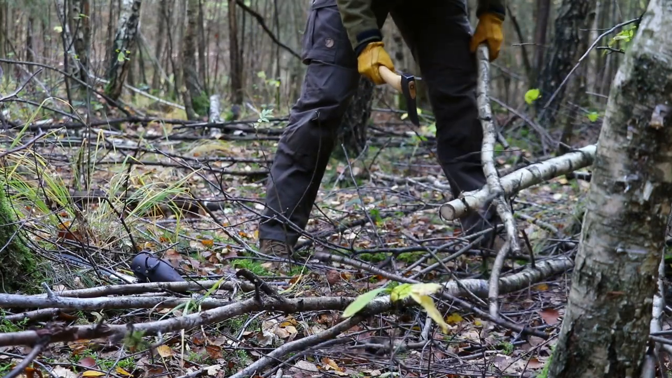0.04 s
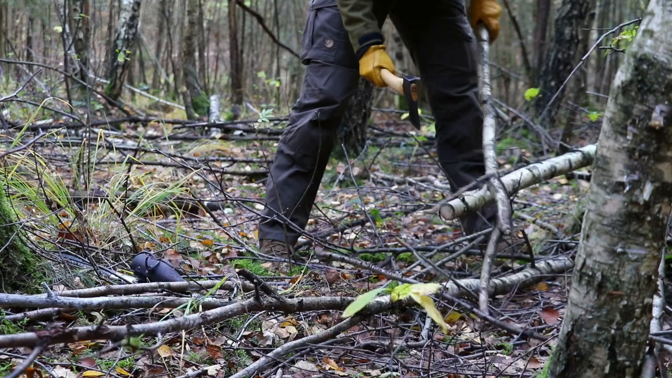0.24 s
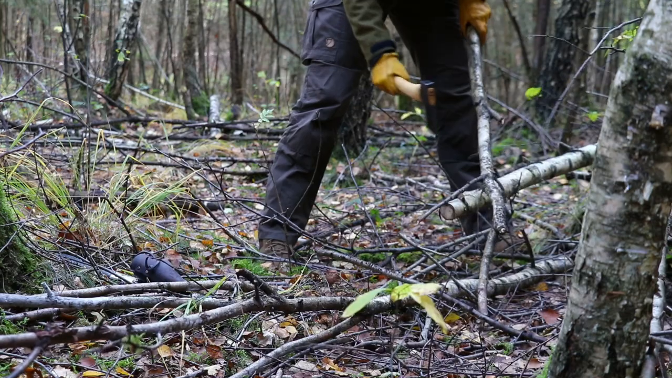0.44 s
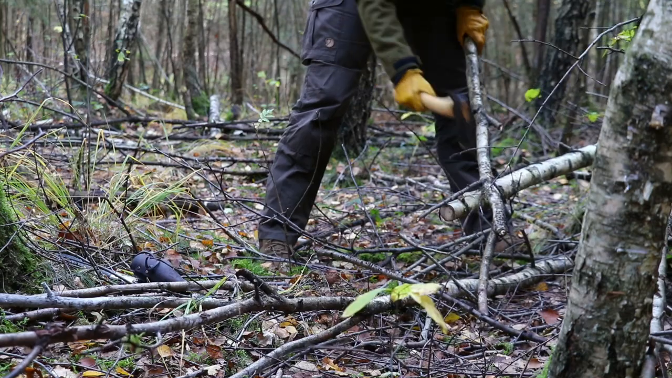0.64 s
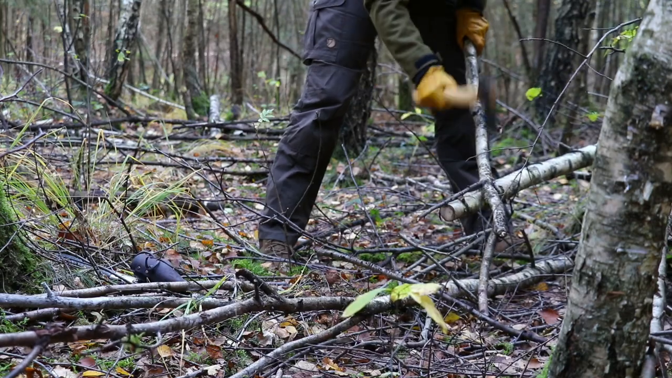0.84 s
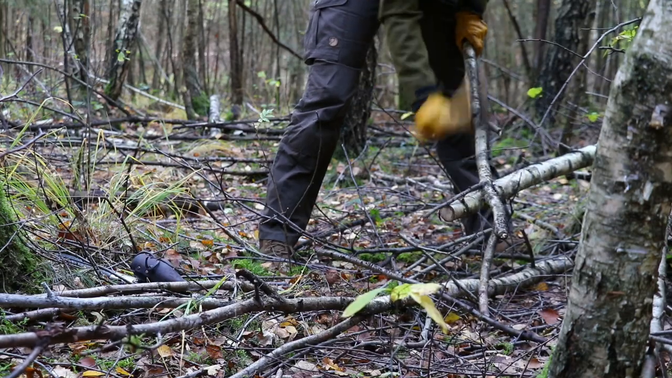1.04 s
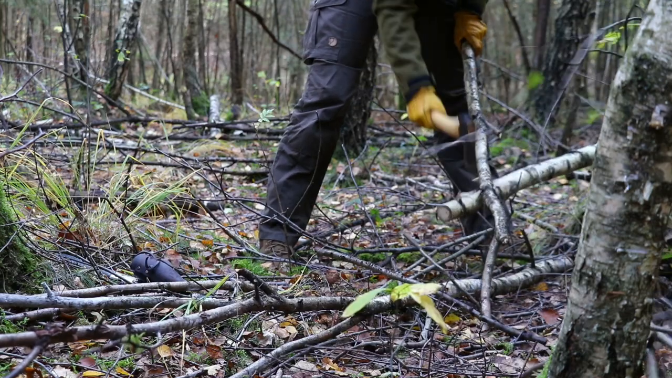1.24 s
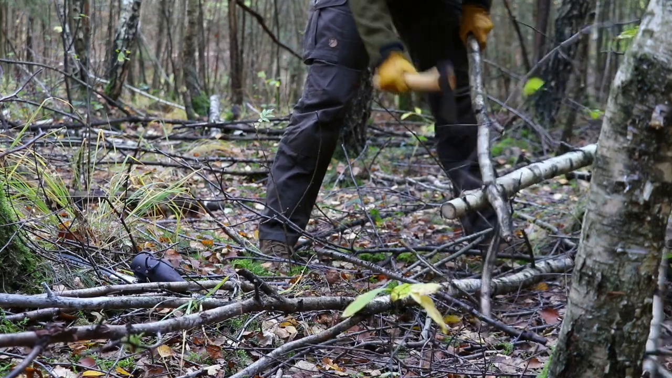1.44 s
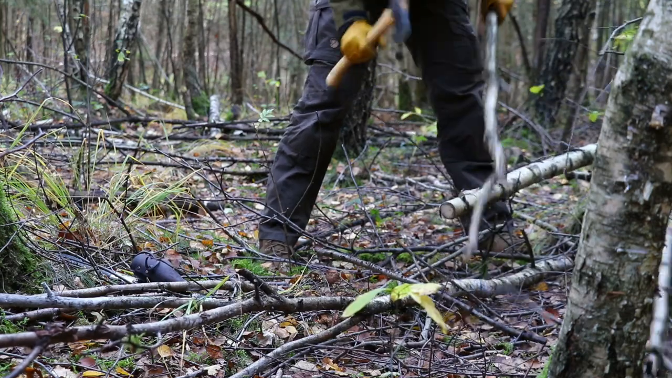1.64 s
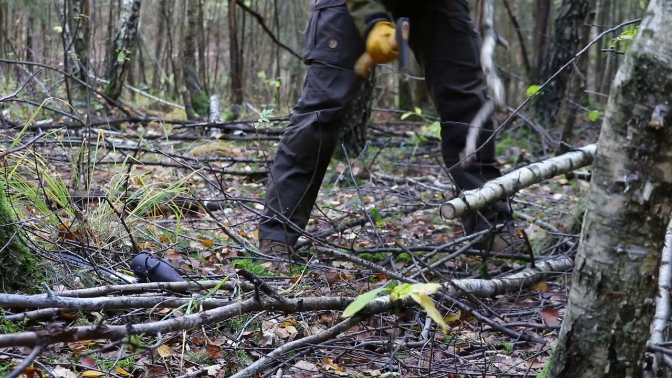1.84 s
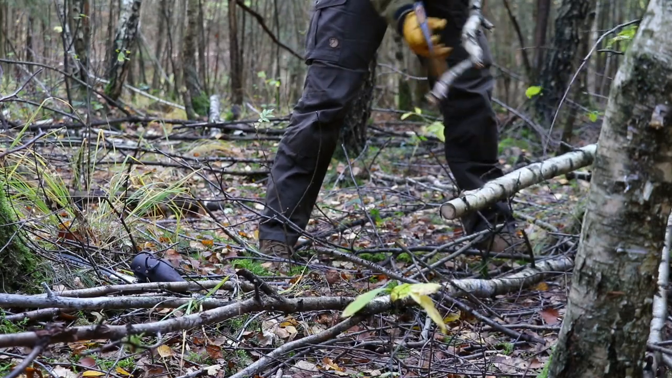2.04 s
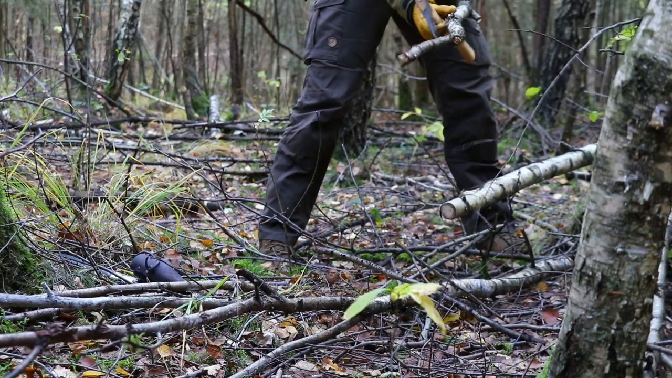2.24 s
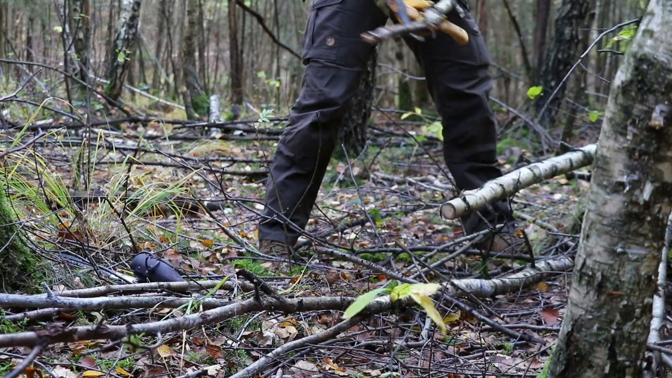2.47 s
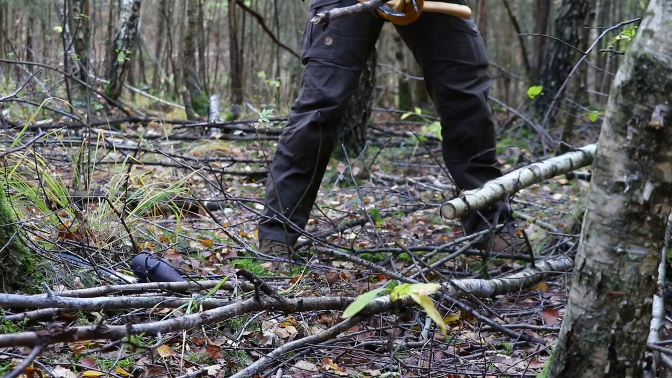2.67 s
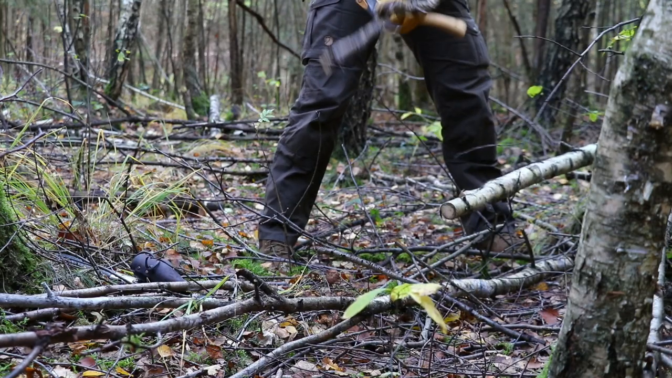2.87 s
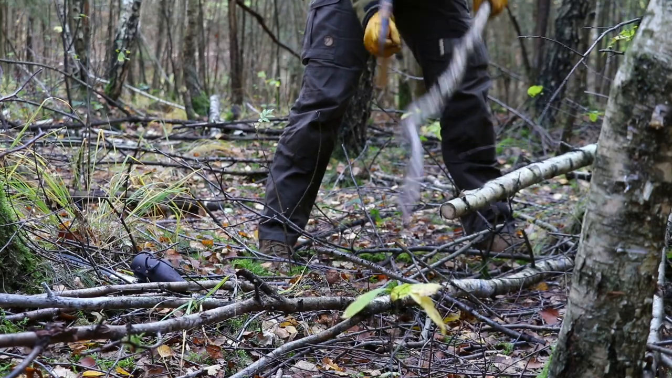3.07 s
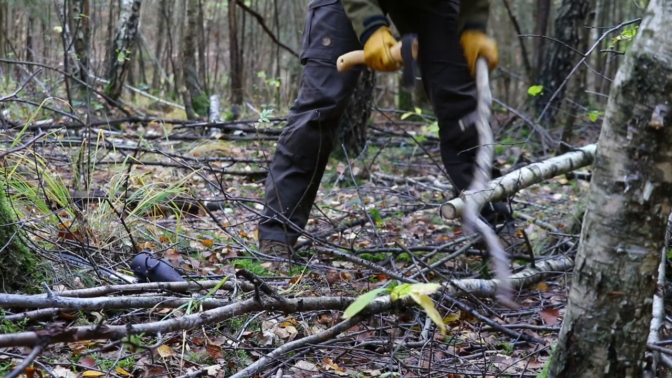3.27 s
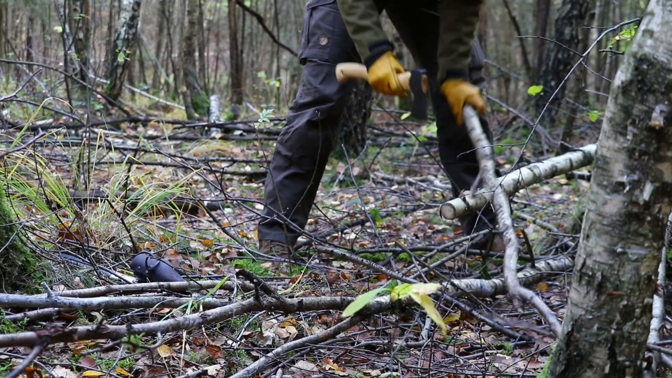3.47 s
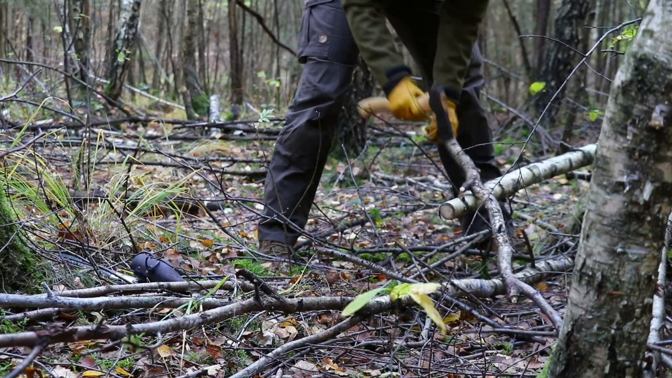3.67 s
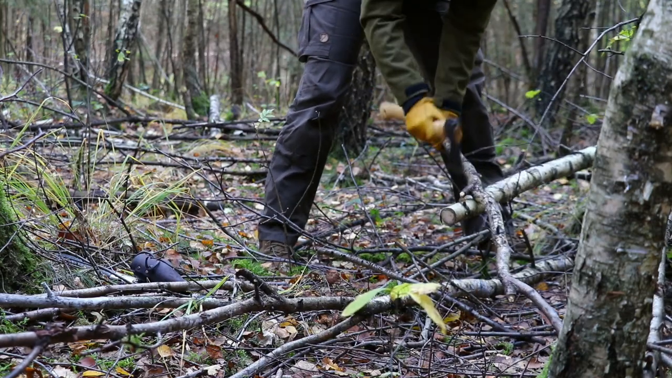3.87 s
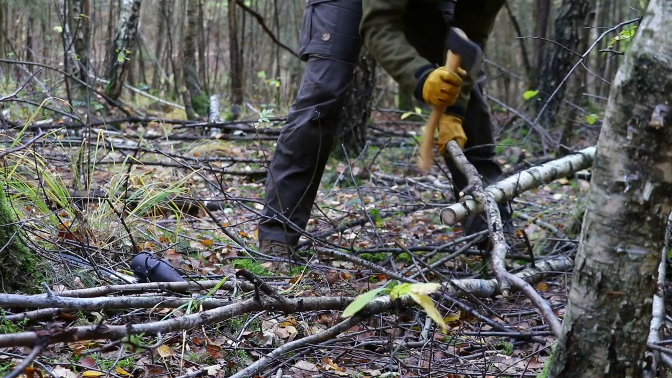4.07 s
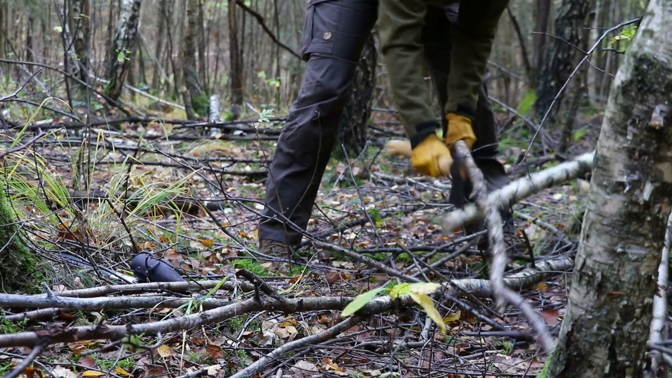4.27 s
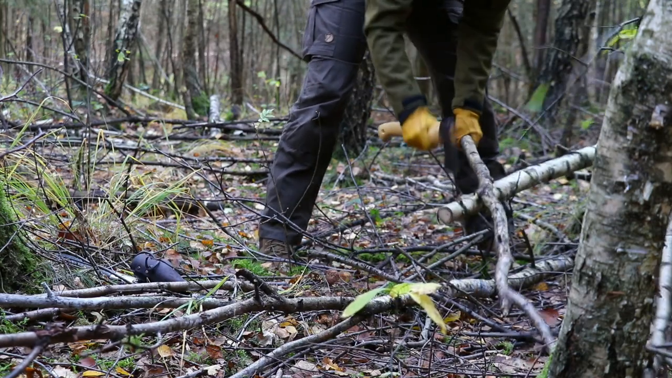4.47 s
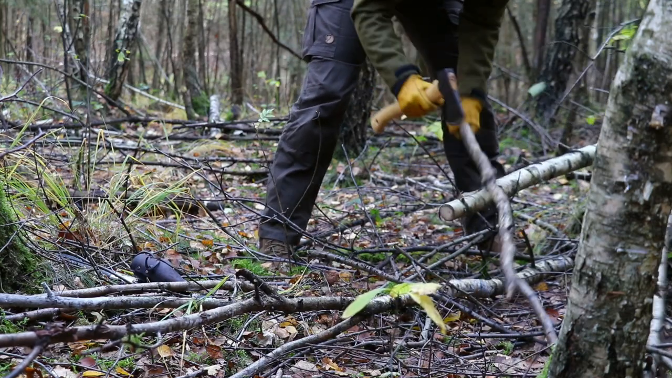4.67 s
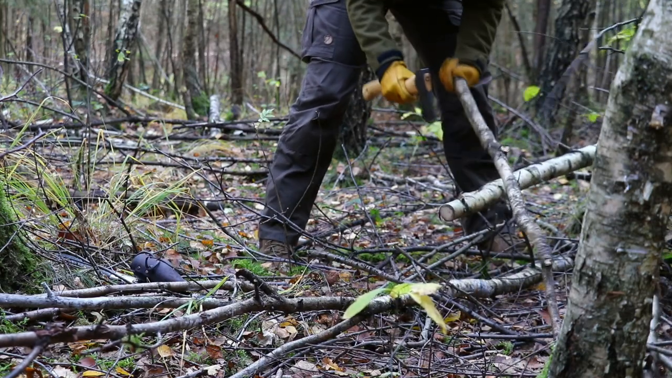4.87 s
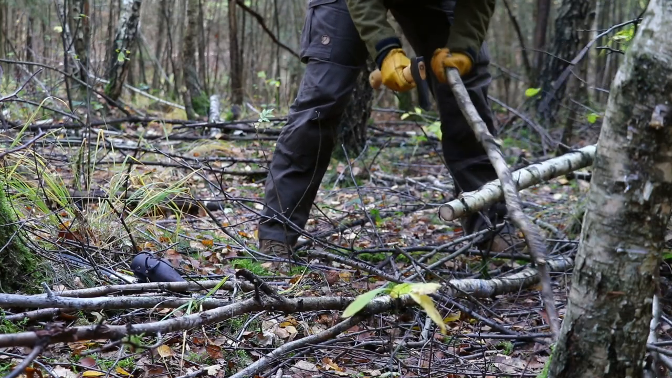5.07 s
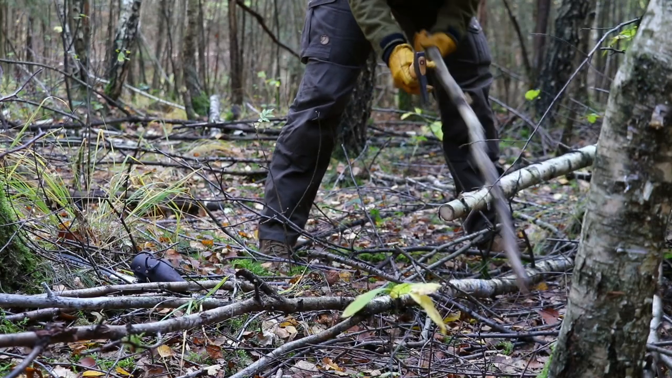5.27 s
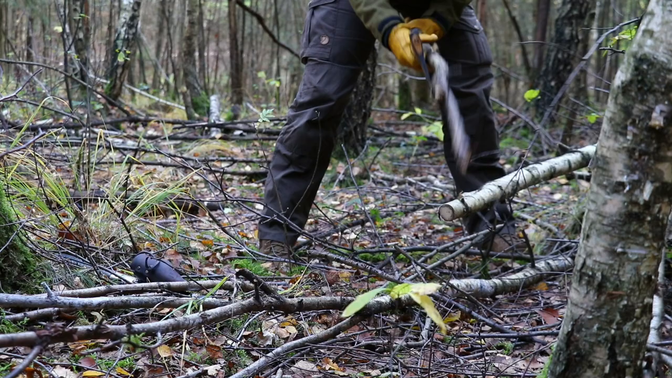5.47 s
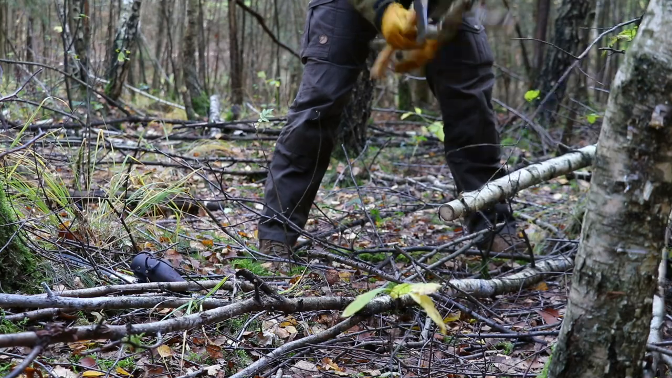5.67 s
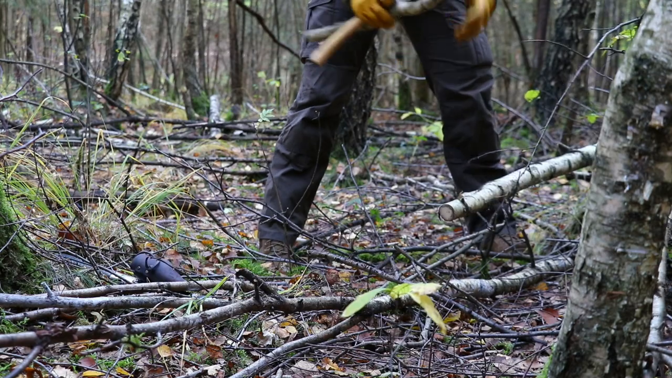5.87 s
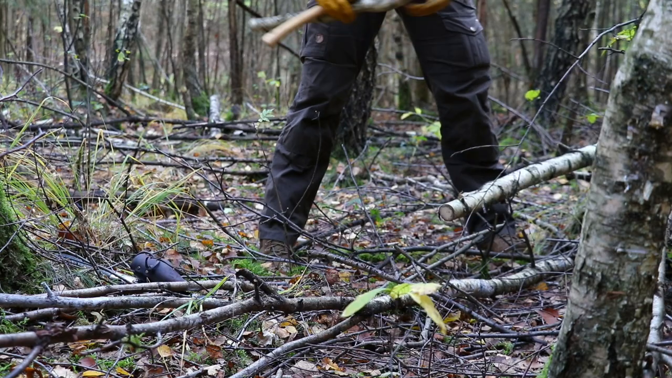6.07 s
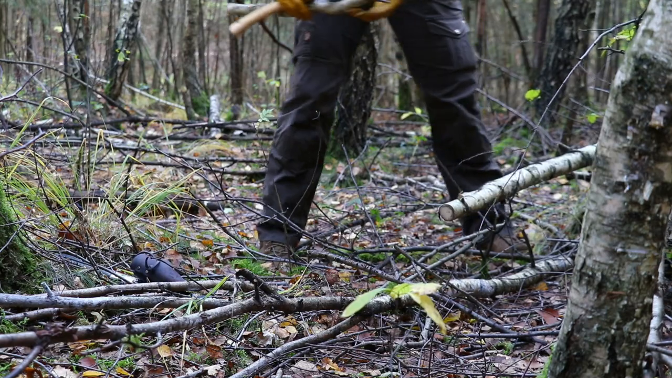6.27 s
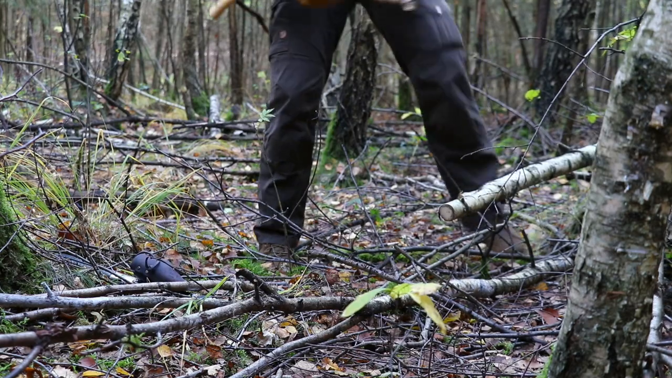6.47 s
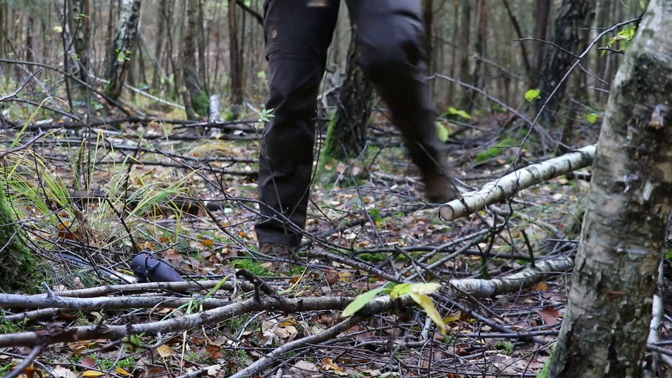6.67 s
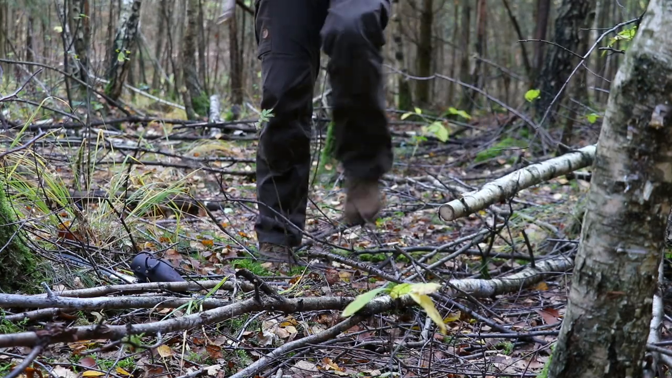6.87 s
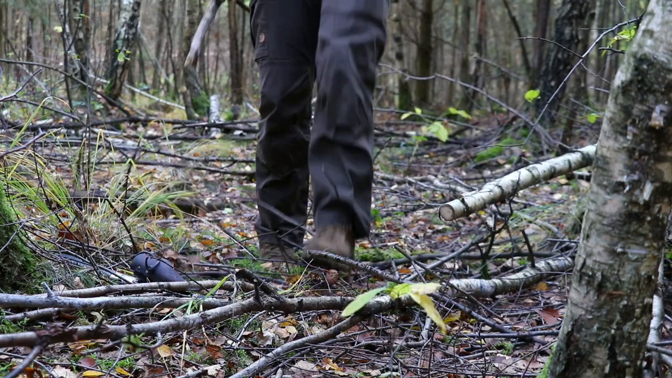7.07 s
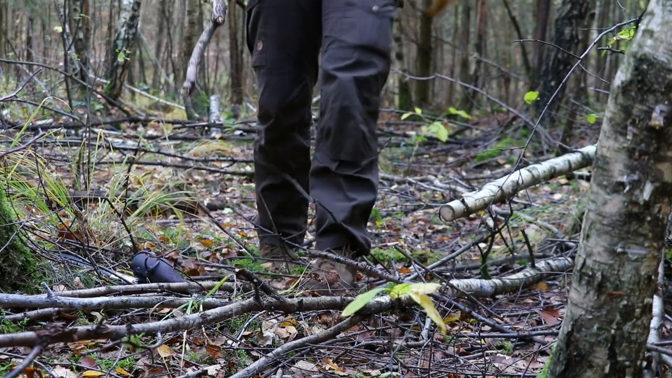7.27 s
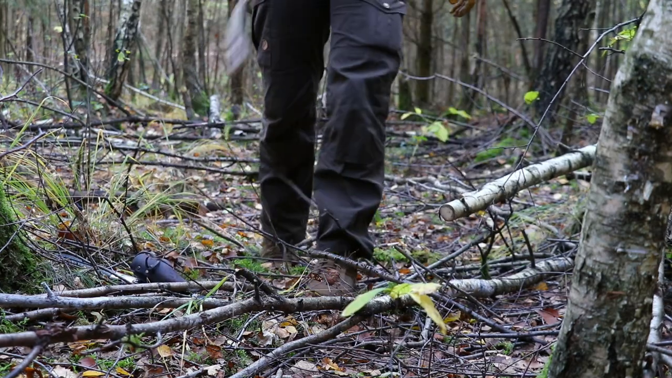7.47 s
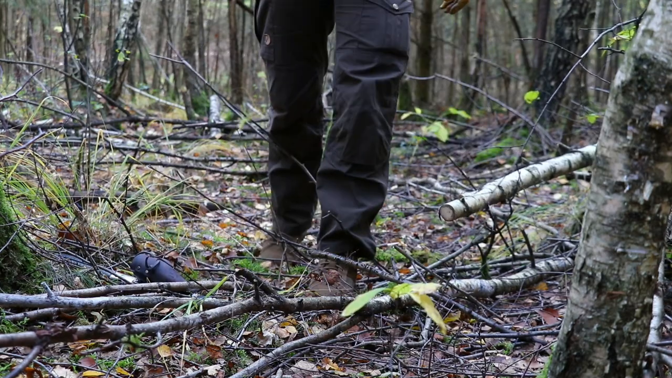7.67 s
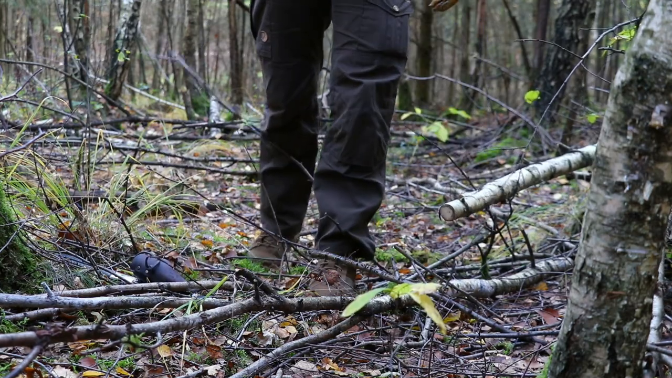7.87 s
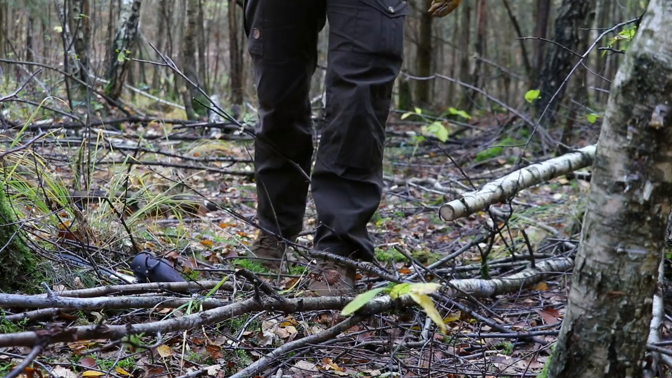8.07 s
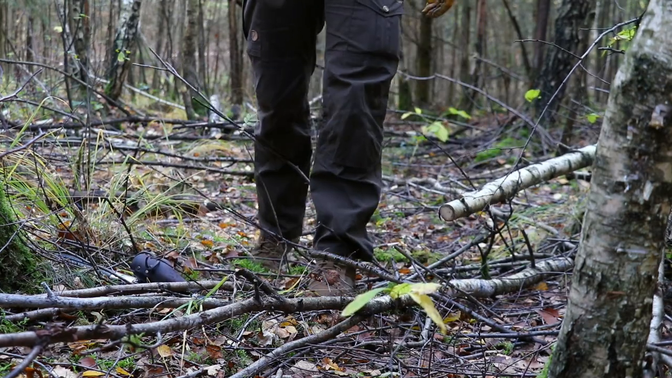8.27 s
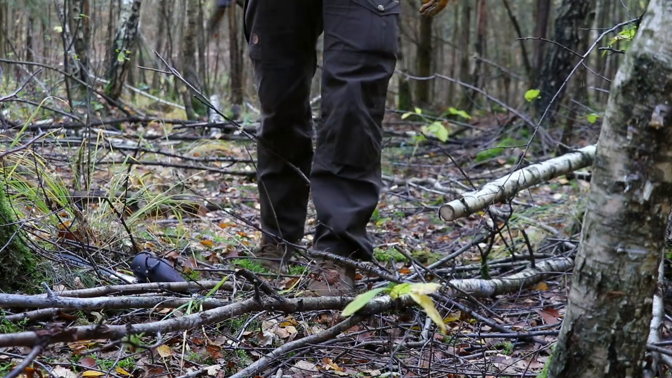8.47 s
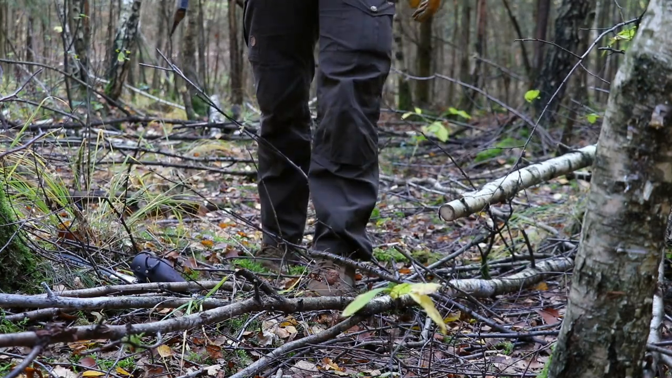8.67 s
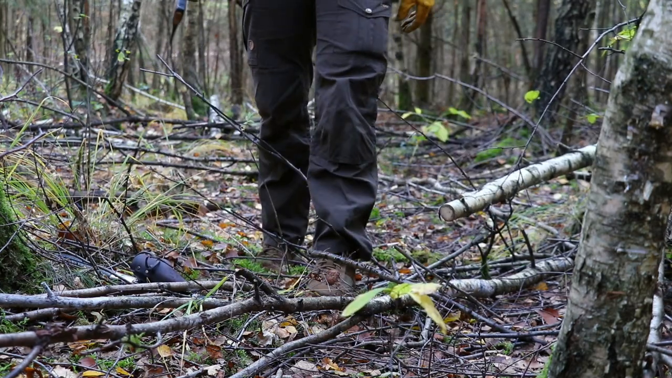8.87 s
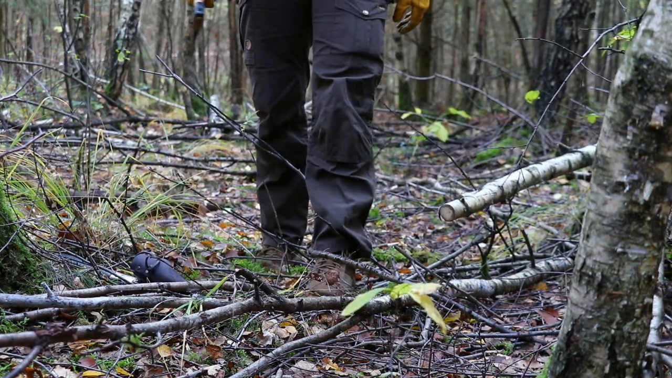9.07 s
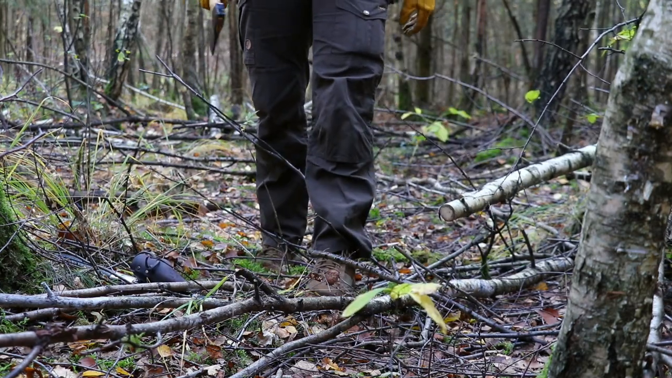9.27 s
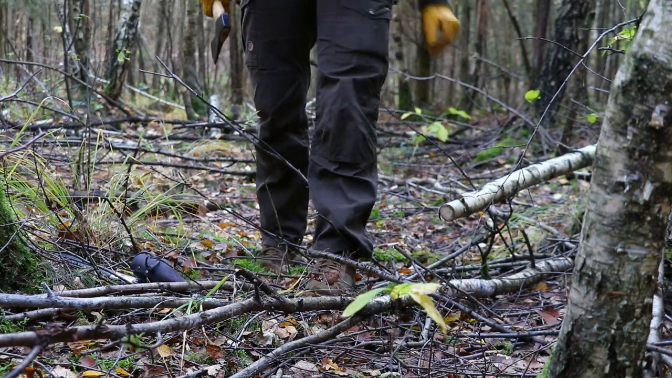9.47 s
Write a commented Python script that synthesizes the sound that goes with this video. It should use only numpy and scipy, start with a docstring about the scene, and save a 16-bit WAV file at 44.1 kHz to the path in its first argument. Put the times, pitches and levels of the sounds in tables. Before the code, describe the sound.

A still, damp wood: soft low-frequency hush, a very faint distant engine hum that sinks in pitch near the end, and thin, high, rising bird whistles now and then. Leaves rustle at the start. At about 1.1 s a hatchet strikes a thin branch with a very sharp, dry crack, a brief woody ring and a low rattle; twigs tick and bark scrapes until 1.7 s. Quiet stirring follows, with a light snap at 3.5 s. At 4.2 s comes a second chop, rougher and more splintery, then small snaps to 5.4 s. Dull knocks and scrapes at 5.9-6.1 s. Near 6.7 s a faint airy whistle falls, then a footstep crushes twigs, crackling brightly from 6.9 to 7.5 s. At 8.06 s a thrown stick lands loudly nearby with a hard wooden knock and ground thump, clattering again at 8.15 s, then rustling and ticking away into quiet by 9 s.

```python
"""A still, damp wood: tree hush (octave noise bands) and a far engine (two sine orders) run throughout.
Leaves rustle from the start (noise grains under stir envelopes); a bird calls now and then (swept sines).
Near 1.1 s and 4.2 s a hatchet chops a thin branch to the right: noise cracks, ringing modes, rattle.
Twigs snap and bark scrapes in between (filtered bursts); a faint whistle falls near 6.7 s (airy sine).
From 8.06 s a thrown stick lands close by and tumbles: pushes ring stick, log and ground."""
import sys
import numpy as np
from scipy import signal
from scipy.fft import rfft, irfft, next_fast_len
from scipy.io import wavfile
from scipy.ndimage import uniform_filter1d

SR = 44100
rng = np.random.default_rng(int(sys.argv[2]) if len(sys.argv) > 2 else 0)


def output_pcm(signal):
    """Save a mono or channel-first signal as 16-bit PCM at the path in sys.argv[1].

    Samples are clipped to [-1, 1] before scaling.
    """
    pcm = np.clip(np.atleast_2d(signal).T, -1, 1) * 32767
    wavfile.write(sys.argv[1], SR, np.round(pcm).astype(np.int16))


N = 420273
T = np.arange(N) / SR

# All pans are left minus right in dB.
# Hush spectrum. Each row: frequency in Hz, relative density in dB per Hz.
HUSH_SPECTRUM = [(15, -48.5), (25, -26), (38, -1.5), (64, -2.5), (108, -6), (170, -3), (190, -8),
                 (277, -4.5), (309, -5), (503, -5), (1230, -7.5), (4250, -25), (8140, -24.5),
                 (16000, -35.5)]
# Hush likeness of the ports. Each row: frequency in Hz, left-right correlation.
HUSH_CORRELATION = [(60, 0.952), (290, 0.84), (640, 0.54), (1400, 0), (16000, 0.066)]
# Hush level. Each row: time in seconds, level in dB.
HUSH_LEVEL = [(0, -46), (2, -46.5), (4, -48), (6, -48), (8, -47.5), (9.53, -48.5)]
# Hush balance. Each row: frequency in Hz, pan in dB.
HUSH_BALANCE = [(60, 1.5), (700, -.5), (2400, -2.5), (4400, 0), (16000, 4.5)]
# Far engine. Each row: time in seconds, firing rate in Hz, first order in dB, second order in dB.
ENGINE = [(0, 83.3, -57, -61.5), (1.5, 83.9, -58, -71), (3, 85.14, -66, -63), (4.5, 83.9, -59, -59),
          (6, 85.04, -62.5, -55.5), (7, 85.4, -64.5, -56), (7.9, 83.3, -62, -63.5), (8.5, 76.2, -66, -62),
          (9.53, 73.3, -78, -72)]
# Hands, boots and sticks stir leaves and twigs. Each row: start in seconds, hold in seconds,
# settling time to -20 dB in seconds (sign ignored), level in dB, dull part in dB re level, pan in dB.
STIRS = [(0.0, 0.01, 0.1674, -48.5, 1.5, -1.5), (0.1, 0.15, 0.2, -59, -2, -2), (.8, 0.036, .5, -69, -13, 2),
         (1.065, 0.059, 0.52, -42.5, -12, -0.5), (1.27, 0.119, 0.37, -49.5, -3, -4),
         (1.44, 0.055, 0.02, -44.5, -6, -3), (1.5, 0.15, 0.2, -47.5, -4, -2),
         (1.726, 0.076, 0.2, -75, 0, -2), (2.298, 0.15, -0.5, -59.5, -7, 0),
         (2.757, 0.091, -1.2, -55, -5.5, -1), (2.971, 0.035, 0.5, -63, -1, -0.5),
         (3.438, 0.066, 0.07, -55, 2, -1.5), (3.613, 0.058, 1, -61, 3.5, -0.5),
         (4.209, 0.012, 0.25, -36.5, -5, 0), (4.403, 0.081, 0.42, -51, -8, -6),
         (4.582, 0.027, 0.2, -51, -3.5, -3), (4.7, 1.0, 0.5, -61, -2.5, -1),
         (5.882, 0.12, 0.5, -60.5, 5, -6), (6.137, 0.13, 9, -63.5, -13, 5), (6.437, 0.065, 0.4, -57, 0, -1),
         (6.667, 0.078, 2, -58.5, 3.5, -1), (6.818, 0.18, 2.5, -54, -4, 1),
         (6.946, 0.27, 0.16, -47, -0.5, 0), (7.294, 0.14, 0.17, -49.5, -3, 3.5),
         (7.559, 0.052, 0.1, -53.5, 2.5, 0.5), (7.692, 0.18, 2, -62, -3, -3),
         (8.063, 0.0094, 0.07, -43, 4, -3), (8.112, 0.044, 0.41, -40.5, -5, -8.5),
         (8.129, 0.034, 0.13, -29, -15, -7), (8.168, 0.02, 0.1661, -34, -12, -3),
         (8.243, 0.11, 0.0952, -36, -9.5, -8.5), (8.333, 0.026, 0.08, -36, -6.5, -7),
         (8.432, 0.017, 0.33, -45, -8, -5), (9.26, 0.11, 6.5, -66, -10.5, 2)]
# Leaf spectrum. Each row: frequency in Hz, relative level in dB.
LEAF_SPECTRUM = [(1200, -17), (2500, -6), (4500, -8), (7000, -2.5), (10000, -0.5), (14000, -6),
                 (17000, -19.5)]
# Bird whistles. Each row: start in seconds, length in seconds, start pitch in Hz,
# pitch approached in Hz (before sag and waver), level in dB, pan in dB.
BIRD_CALLS = [(.15, 0.19, 7180, 7740, -62, 5), (0.73, 0.23, 7140, 7900, -58.5, 0.5),
              (1.95, .15, 7650, 7940, -62.5, -3), (2.29, .15, 7190, 7700, -61, -0.5),
              (2.7, .17, 7130, 7890, -59, -1), (5.0, 0.119, 7500, 7890, -61.5, -4),
              (5.2, .2, 7750, 7900, -71, -2), (5.822, 0.16, 7250, 7920, -62, 2),
              (6.166, 0.178, 7400, 7960, -59, 4.5), (8.67, 0.2, 7150, 7860, -58.5, 4),
              (9.27, 0.16, 7310, 7710, -62, 1)]
# Fibres give way under the blade. Each row: start in seconds, crack in dB, crack colour in Hz,
# fade in seconds, ring in dB, ring colour in Hz, pan in dB (of the crack; less for the ring).
FIBRE_CRACKS = [(1.075, 1, 5700, 0.00035, -20.5, 900, 4.5), (1.0765, -13.5, 3320, 0.0038, -36, 3000, -10.5),
                (1.0772, -1, 6900, 0.00084, -23, 3600, -10.5), (1.0773, -9, 7340, 0.0016, -32, 3000, -5),
                (1.0830, -25, 6000, 0.00324, -18, 1200, 2), (1.0886, -33.5, 8000, 0.0031, -20, 750, -10.5),
                (4.2128, -13.5, 4970, 0.0063, -13.5, 1100, 16.5),
                (4.214, -15, 2650, 0.0055, -13.5, 1600, -6), (4.2147, -9.5, 3300, 0.0025, -21, 2990, -6),
                (4.2161, -12.5, 9000, 0.0026, -8, 1600, -11), (4.223, -20, 10000, 0.00345, -15.5, 1250, -6),
                (4.228, -20, 3300, .006, -25, 1250, -4)]
# Chopped branch modes. Each row: frequency in Hz, relative level in dB, T60 in seconds.
BRANCH_MODES = [(330, -27, 0.035), (470, 0, 0.026), (653, -9.5, 0.058), (778, -10, 0.054),
                (984, -8.5, 0.021), (1240, -7.5, 0.039), (1400, -3, 0.019), (1508, 1.5, 0.016),
                (1870, -8, 0.021), (2040, -13.5, 0.017), (2880, -15, 0.0076), (3400, -15, 0.017),
                (3900, -23, .014)]
# Hatchet blows. Each row: start in seconds, rattle in dB, rattle pitch in Hz,
# rattle build-up in seconds, ground thump in dB.
BLOWS = [(1.0780, -26.5, 426, 0.03, -47), (4.2200, -24, 373, 0.022, -36)]
# Branch shuddering on its log. Each row: multiple of rattle pitch, width in Hz, relative level in dB.
RATTLE_BANDS = [(.55, 90.5, 5.5), (.82, 79.6, 10), (1.01, 70, -2), (1.7, 200, 1.5), (2.4, 300, -5),
                (3.3, 500, -31)]
# Branch springing back onto its log. Each row: start in seconds, level in dB, pitch in Hz,
# build-up in seconds.
REBOUNDS = [(1.081, -25, 380, 0.002), (1.095, -26, 460, 0.0041), (1.108, -24.5, 410, 0.0034),
            (1.127, -31.5, 414, 0.0069), (1.167, -38, 426, .005), (4.233, -27, 244, 0.0016),
            (4.249, -24, 368, 0.0055), (4.272, -29.5, 365, 0.0058), (4.297, -44, 349, 0.011)]
# Soft ground modes. Each row: frequency in Hz, relative level in dB, T60 in seconds.
GROUND_MODES = [(63.3, 7, 0.094), (93.5, 2, 0.08), (145, 0, 0.044)]
# Twig snaps. Each row: start in seconds, crack in dB, knock in dB, knock pitch in Hz, thud in dB,
# pan in dB (of the crack; more for the knock, less for the thud).
TWIG_SNAPS = [(1.2232, -34, -25.5, 1240, -36, -1), (1.3397, -28, -38, 875, -38, -3),
              (1.6945, -28, -44, 1640, -58, -5), (3.496, -33, -32, 1390, -33.5, -3),
              (4.2842, -22, -29, 2500, -45, -2), (4.4151, -31, -47, 1090, -51, -5),
              (4.4867, -26, -47, 2900, -50, -4), (4.8283, -16.5, -51, 2700, -37, -1),
              (5.3985, -25.5, -36, 1490, -41, -2), (5.9348, -45, -32, 1500, -26, -11),
              (6.032, -48, -33, 1240, -39, -3), (6.6093, -29, -41, 1164, -61, 1),
              (6.8596, -43, -27.5, 1340, -45, -1), (6.9529, -13, -13.5, 1310, -28, -1),
              (6.988, -31, -35, 1531, -39, 1), (7.148, -43, -33, 3000, -48, -1),
              (7.171, -38.5, -36, 3030, -58, -1), (7.1548, -20, -25, 3140, -38, -1),
              (7.184, -21, -40, 2880, -48, 0.5), (7.2097, -31, -30.5, 2620, -38, -8),
              (7.2585, -20.5, -31.5, 2000, -26.5, 2.5), (7.2899, -8.5, -38, 2500, -30, -3),
              (7.3322, -8, -41, 2180, -20, 0), (7.338, -30, -35, 2600, -54.5, -5),
              (7.345, -42, -35, 3000, -52, -7), (7.380, -36, -28, 2800, -50, -1),
              (7.385, -42, -39, 1500, -55, -1.5), (7.421, -39, -33, 3000, -55, -7),
              (7.459, -35, -34, 2500, -53, 4), (7.481, -38, -36, 2200, -55, -4),
              (7.414, -39, -25, 2620, -57.5, -2), (7.4456, -25, -27, 2200, -58, -4),
              (7.6033, -38, -32, 2400, -61, -6), (7.878, -38, -35, 2600, -51, -1),
              (7.902, -41, -53, 3030, -58, 0.5), (8.0325, -26, -39, 3520, -56, -2),
              (8.479, -41.5, -39, 2490, -55, -3), (7.9928, -29, -29, 1470, -59, -2),
              (8.095, -17, -24, 2820, -36, -6), (8.301, -25, -44, 3700, -44.5, -9.5),
              (8.339, -17, -49.5, 3240, -40, -2.5), (8.444, -31, -52, 2970, -64, 1),
              (8.604, -29, -38, 3020, -43, -5), (8.667, -31.5, -34.5, 3260, -55, -7),
              (8.7646, -34, -28.5, 4660, -55, -7)]
# Dull knocks of wood and boot. Each row: start in seconds, level in dB, pitch in Hz,
# build-up in seconds, pan in dB.
DULL_KNOCKS = [(5.935, -26, 825, 0.0012, -6), (5.938, -37.5, 163, 0.0055, 0),
               (6.86, -34.5, 225, 0.0044, -1), (6.952, -33.5, 130, .003, -1),
               (8.069, -10.5, 149, .002, 0.5), (8.183, -28.5, 458, .012, 2)]
# Bark and twig scrapes. Each row: start in seconds, length in seconds, centre in Hz, level in dB.
BARK_SCRAPES = [(1.356, 0.019, 8530, -41), (1.447, 0.02, 700, -43), (1.458, 0.02, 8400, -37),
                (2.427, 0.031, 7500, -48), (2.424, 0.036, 3000, -57), (4.8, 0.021, 2600, -58),
                (5.994, 0.03, 4200, -45), (6.008, 0.02, 2500, -48), (6.054, 0.018, 3500, -49),
                (7.015, .025, 1300, -48), (8.034, 0.006, 6960, -42), (8.337, 0.008, 8300, -26),
                (8.281, .012, 3200, -35), (8.363, 0.0064, 4000, -36)]
# Faint whistle as a leg swings. Each row: time in seconds, pitch in Hz, level in dB.
LEG_WHISTLE = [(6.678, 2900, -66.5), (6.69, 2700, -44), (6.72, 2100, -49), (6.76, 1780, -54),
               (6.785, 1600, -46), (6.81, 1419, -49), (6.86, 1375, -50), (6.92, 1387, -54),
               (6.97, 1560, -49), (7.0, 1700, -68)]
# Stick contacts. Each row: start in seconds, ring in dB, log in dB, ground thump in dB, crack in dB,
# contact time in seconds, pan in dB (of ring and log; doubled for the crack).
CONTACTS = [(8.0640, -5.5, -18, -22, -5, 0.00026, -1.5), (8.071, -15.5, -30, -21, -21, 0.0021, -2),
            (8.083, -22, -34, -42, -36.5, 0.00074, -0.5), (8.1121, -39, -45, -44, -22, 0.0014, -3),
            (8.122, -46, -46.5, -46, -24.5, 0.002, 2.5), (8.147, -27, -4.5, -24, -3, 0.00033, -6),
            (8.1493, -16, -4, -33, -17, 0.0003, -0.5), (8.152, -22, -15.5, -17.5, -8.5, 0.00054, -3),
            (8.161, -37, -39, -34, -30, 0.0029, -1), (8.187, -25, -21, -27, -28, 0.00042, 2),
            (8.195, -34.5, -25, -27.5, -25.5, 0.00053, -2), (8.225, -42, -50, -36, -38, 0.0036, -1),
            (8.25, -43, -47, -36, -43.5, 0.0028, 0), (8.27, -46, -51, -37, -38.5, 0.00293, -0.5),
            (8.295, -41, -47, -32.5, -33.5, 0.0019, -3), (8.352, -39, -39, -33, -46, 0.00041, 6)]
# Thrown stick modes. Each row: frequency in Hz, relative level in dB, T60 in seconds.
STICK_MODES = [(248, -4, 0.017), (314, -4, 0.053), (420, -7.5, 0.043), (546, -1, 0.043), (670, 2.5, 0.039),
               (806, 0, 0.037), (960, -5, 0.022), (1063, -1, 0.048), (1270, -3.5, 0.036), (1660, -6, 0.024),
               (2040, -4, 0.026), (2830, 3, 0.015), (3630, -13, 0.0112)]
# Modes of the log it falls across. Each row: frequency in Hz, relative level in dB, T60 in seconds.
LOG_MODES = [(150, -7.5, 0.022), (450, -1, 0.029), (776, -6, 0.027), (1105, -1, 0.021), (1306, -6.5, 0.03),
             (2007, 1.5, 0.018), (2750, -5, 0.022), (3370, -23.5, .02)]

STIR_RISE_SHARE, STILL_LEAVES_DB = 0.28, -64  # build-up as share of hold; leaves at rest
DULL_PAN_RATIO = 1.48
BIRD_WAVER_RMS_HZ, BIRD_SAG_HZ = 69.7, 60
SNAP_DELAY_S, SNAP_FADE_S = 0.00073, 0.00063
THICK_FADE_S = 0.013  # added fade at full-scale knock: thicker wood knocks louder, breaks more slowly
TRUNKS_T60_S, TRUNKS_DB, TRUNKS_LOWPASS_HZ = 0.72, -28.5, 1500
PORT_LAG_S = 0.0001
MIC_DIP_HZ, MIC_DIP_WIDTH_HZ, MIC_DIP_SHARE = 5120, 1070, 0.33
TOP_HZ, CLIP_LEVEL = 16200, 0.95


def undb(db):
    """Amplitude ratio from dB."""
    return 10 ** (np.asarray(db) / 20)


def unit(x):
    """Scales to rms 1."""
    return x / np.sqrt(np.mean(x ** 2))


def crest(x):
    """Scales to peak 1."""
    return x / np.max(np.abs(x))


def curves(table):
    """Columns of a time table, interpolated per sample."""
    s, *columns = np.transpose(table)
    return [np.interp(T, s, c) for c in columns]


def along(table, hz):
    """A frequency table read on a log-frequency axis."""
    f, v = np.transpose(table)
    return np.interp(np.log(np.maximum(hz, 1)), np.log(f), v)


def colour(x, table):
    """Filters x by a (Hz, dB) table."""
    size = next_fast_len(N)
    gain = undb(along(table, np.fft.rfftfreq(size, 1 / SR)))
    return irfft(rfft(x, size) * gain, size)[..., :N]


def band(x, hz, width_hz):
    """One resonance, gain 1 at the centre."""
    centre_hz = min(hz, 0.45 * SR)
    q = hz / min(width_hz, 0.4 * SR)
    return signal.lfilter(*signal.iirpeak(centre_hz, q, fs=SR), x)


def walk(rate_hz):
    """Random levels held 1 / rate_hz and smoothed twice; rms 1."""
    k = int(SR / rate_hz)
    steps = np.repeat(rng.standard_normal(N // k + 1), k)
    return unit(uniform_filter1d(uniform_filter1d(steps, k), k)[:N])


def sides(pan_db):
    """Left and right gains."""
    return undb(np.array([pan_db, -pan_db]) / 2)


def add(out, s, x, pan_db):
    """Mixes a short sound into out at s seconds."""
    i = int(s * SR)
    x = x[..., :N - i]
    out[:, i:i + x.shape[-1]] += sides(pan_db)[:, None] * x


def hush():
    """Octave bands of far air and leaves that swell together and flicker alone."""
    size = next_fast_len(N)
    hz = np.fft.rfftfreq(size, 1 / SR)
    alike = np.clip(along(HUSH_CORRELATION, hz), 0, 1)
    mid, side = rfft(rng.standard_normal((2, size)))
    both = np.sqrt(1 + alike) * mid + np.sqrt(1 - alike) * side * np.array([[1], [-1]])
    both = both * undb(along(HUSH_SPECTRUM, hz)) * sides(along(HUSH_BALANCE, hz))
    octave = np.log2(np.maximum(hz, 1) / 16)
    swell_db = 0.5 * walk(0.7)
    out = 0
    for centre in range(11):
        share = np.cos(np.pi / 2 * np.clip(octave - centre, -1, 1)) ** 2
        flicker_db = 0.97 * walk(8.3)
        out = out + undb(swell_db + flicker_db) * irfft(both * share, size)[:, :N]
    return unit(out) * undb(curves(HUSH_LEVEL)[0])


def drone():
    """Two orders of a far engine, wavering with the air."""
    hz, first_db, second_db = curves(ENGINE)
    turn = 2 * np.pi * np.cumsum(hz * (1 + 0.00322 * walk(2.287))) / SR
    first = undb(first_db + 2 * walk(9.6)) * np.sin(turn)
    second = undb(second_db + 0.5 * walk(7.1)) * np.sin(2 * turn)
    return np.sqrt(2) * (first + second)  # table levels are rms


def stirring():
    """Crisp and dull gains in both ports: each stir builds up, holds and settles; powers add."""
    crisp, dull = np.full((2, 2, N), undb(2 * STILL_LEAVES_DB))
    for s, hold_s, settle_s, db, dull_db, pan_db in STIRS:
        t = np.arange(0, abs(hold_s) + 2 * abs(settle_s), 1 / SR)
        rise = np.minimum(t / abs(STIR_RISE_SHARE * hold_s), 1)
        fall_db = 20 * np.maximum(t - hold_s, 0) / abs(settle_s)
        power = (rise * undb(db - fall_db)) ** 2
        # dB doubled: these are powers
        add(crisp, max(s, 0), power, 2 * pan_db)
        add(dull, max(s, 0), power * undb(2 * dull_db), 2 * DULL_PAN_RATIO * pan_db)
    return np.sqrt(crisp), np.sqrt(dull)


def rustle():
    """Dense leaf grains of uneven size, partly shared by the two ports."""
    crisp, dull = stirring()
    sizes = undb(2.7 * np.minimum(rng.exponential(size=N), 4))
    ticks = (rng.random(N) < 2000 / SR) * sizes  # about 2000 per second
    grains = 0.7 + unit(signal.lfilter([1], [1, -0.96], ticks))
    mid, left, right = grains * rng.standard_normal((3, N))
    leaves = colour(0.21 * mid + np.array([left, right]), LEAF_SPECTRUM)
    low = signal.sosfilt(signal.butter(4, 4700, fs=SR, output="sos"), leaves)
    high = signal.sosfilt(signal.butter(4, 4700, "high", fs=SR, output="sos"), leaves)
    # clumps partly common to both parts
    clumps_db = 0.73 * walk(90)
    crisp_leaves = unit(undb(clumps_db + 1.6 * walk(60)) * high)
    dull_leaves = unit(undb(clumps_db + 2.4 * walk(60)) * low)
    return crisp * crisp_leaves + dull * dull_leaves


def bird():
    """Thin, husky whistles that rise fast, level off and waver, broken up by the leaves on the way."""
    out = np.zeros((2, N))
    waver_hz = BIRD_WAVER_RMS_HZ * walk(60)
    for s, length_s, from_hz, to_hz, db, pan_db in BIRD_CALLS:
        u = np.arange(0, 1, 1 / (length_s * SR))
        hz = to_hz + (from_hz - to_hz) * np.exp(-u / 0.24) - BIRD_SAG_HZ * u ** 2
        hz = hz + waver_hz[int(s * SR):][:len(u)]
        swell = np.sin(np.pi * u ** 0.78) ** 0.5
        add(out, s, undb(db) * swell * np.sin(2 * np.pi * np.cumsum(hz) / SR), pan_db)
    husk = 0.9 + np.array([walk(300), walk(300)])
    return out * husk * undb(1.2 * walk(40))


def splinter(fade_s, tail):
    """A sharp break, then noise with a weaker, slower tail; rows: shared, left only, right only."""
    t = np.arange(int(0.04 * SR)) / SR
    envelope = np.exp(-t / max(fade_s, 0.0002)) + tail * np.exp(-t / 0.011)
    burst = rng.standard_normal((3, len(t))) * envelope
    burst[0, 2] += 4.5
    return burst


def spread(burst, apart):
    """Both ports hear the shared row, each with some of its own."""
    return burst[0] + apart * burst[1:]


def ring(modes, push, scatter_db=2, lag_s=0.00004):
    """Decaying modes driven by a push; each blow lands on another spot and weights them anew.
    Each mode leaves another part of the wood, so it leads in one port or the other."""
    t = np.arange(int(0.25 * SR)) / SR
    hz, db, t60 = np.transpose(modes)[:, :, None]
    polarity = (-1.) ** np.arange(len(hz))[:, None]
    spot = undb(db + scatter_db * rng.standard_normal(hz.shape)) * polarity
    lead = lag_s * rng.standard_normal(hz.shape) * np.array([1, -1])[:, None, None]
    decay = 1000. ** (-t / t60)
    rings = np.sum(spot * np.sin(2 * np.pi * hz * (t + lead)) * decay, axis=1)
    return crest(signal.fftconvolve(rings, push[None], axes=1))


def rattle(hz, build_s):
    """A swell of friction in the resonances of branch and log; also returns its raw push."""
    t = np.arange(int(0.3 * SR)) / SR
    friction = spread(rng.standard_normal((3, len(t))), 0.21)
    shudder = t / build_s * np.exp(-t / build_s) * friction
    bands = [undb(db) * band(shudder, k * hz, width_hz) * np.sqrt(100 / width_hz)
             for k, width_hz, db in RATTLE_BANDS]
    return crest(sum(bands)), shudder[0]


def thump(push):
    """The ground gives way and settles back, so the deepest part cancels."""
    return crest(band(ring(GROUND_MODES, push, lag_s=0), 129, 110))


def rebound(hz, build_s):
    """A soft knock on one low mode of the wood, a little rough."""
    t = np.arange(0, 8 * build_s, 1 / SR)
    rough = band(spread(rng.standard_normal((3, len(t))), 0.4), 1.2 * hz, 0.32 * hz)
    mode = np.sin(2 * np.pi * hz * t)
    return crest(t / build_s * np.exp(-t / build_s) * (mode + 0.27 * unit(rough)))


def chops():
    """Fibre cracks ring the branch; it shudders and rebounds on the log and shakes the ground."""
    out = np.zeros((2, N))
    for s, crack_db, hz, fade_s, ring_db, ring_hz, pan_db in FIBRE_CRACKS:
        burst = spread(splinter(fade_s, 0.037), 0.091)
        crack = crest(band(band(burst, hz, 0.39 * hz), hz, 0.79 * hz))
        add(out, s, undb(crack_db) * crack, pan_db)
        push = band(splinter(0.00029, 0.01)[0], ring_hz, 0.58 * ring_hz)
        add(out, s, undb(ring_db) * ring(BRANCH_MODES, push), 0.22 * pan_db)
    for s, rattle_db, hz, build_s, thump_db in BLOWS:
        shudder, push = rattle(hz, build_s)
        add(out, s, undb(rattle_db) * shudder, -0.5)
        add(out, s + 0.032, undb(thump_db) * thump(push), 0.3)
    for s, db, hz, build_s in REBOUNDS:
        add(out, s, undb(db) * rebound(hz, build_s), -0.6)
    return out


def snaps():
    """A short crack with a splintery tail, a knock of the wood, a thud of what holds it; dull knocks."""
    out = np.zeros((2, N))
    for s, crack_db, knock_db, hz, thud_db, pan_db in TWIG_SNAPS:
        burst = splinter(SNAP_FADE_S + THICK_FADE_S * undb(knock_db), 0.098)
        crack = crest(band(spread(burst, 1.0), 5500, 7800))
        knock = crest(band(band(spread(burst, 0.25), hz, 0.45 * hz), hz, 6.3 * hz))
        thud = crest(band(band(burst[0], 390, 740), 470, 1000))
        add(out, s + SNAP_DELAY_S, undb(crack_db) * crack, pan_db)
        add(out, s + SNAP_DELAY_S, undb(knock_db) * knock, 2.2 * pan_db)
        add(out, s + SNAP_DELAY_S, undb(thud_db) * thud, 0.18 * pan_db)
    for s, db, hz, build_s, pan_db in DULL_KNOCKS:
        add(out, s, undb(db) * rebound(hz, build_s), pan_db)
    return out


def scrapes():
    """Short gritty rubs of bark and twigs, each noise in one resonance."""
    out = np.zeros((2, N))
    for s, length_s, hz, db in BARK_SCRAPES:
        size = int(length_s * SR)
        grit = spread(rng.standard_normal((3, size)), 0.67)
        rub = unit(band(grit, hz, 0.21 * hz))
        add(out, s, undb(db) * np.hanning(size) ** 0.5 * rub, -4)
    return out


def whistle():
    """An airy, mostly falling tone with a weak octave, its level fluttering in each port."""
    hz, db = curves(LEG_WHISTLE)
    airy = 0.5 + 0.85 * np.array([walk(420), walk(420)])
    heard = (T > LEG_WHISTLE[0][0]) & (T < LEG_WHISTLE[-1][0])
    turn = 2 * np.pi * np.cumsum(hz) / SR
    tone = np.sin(turn) + undb(-20) * np.sin(2 * turn)
    return heard * undb(db + 1.8 * walk(45)) * airy * tone


def landing():
    """Each contact is a half-sine push: bark cracks, stick and log ring and the ground thumps."""
    out = np.zeros((2, N))
    for s, ring_db, log_db, thump_db, crack_db, contact_s, pan_db in CONTACTS:
        push = np.sin(np.pi * np.arange(0, contact_s, 1 / SR) / contact_s)
        add(out, s, undb(ring_db) * ring(STICK_MODES, push), pan_db)
        add(out, s, undb(log_db) * ring(LOG_MODES, push), pan_db)
        add(out, s, undb(thump_db) * thump(push), 0.3)
        crack = crest(band(spread(splinter(0.001, 0.073), 0.91), 3800, 4900))
        add(out, s, undb(crack_db) * crack, 2.0 * pan_db)
    return out


def trunks(x):
    """Tree trunks scatter every blow back as a dull, fading wash."""
    t = np.arange(int(0.8 * SR)) / SR
    envelope = 1000. ** (-t / TRUNKS_T60_S) * (1 - np.exp(-t / 0.005))
    wash = rng.standard_normal((2, len(t))) * envelope
    wash = signal.lfilter(*signal.butter(1, TRUNKS_LOWPASS_HZ, fs=SR), wash)
    wash = wash / np.sqrt(np.sum(wash[0] ** 2))
    return undb(TRUNKS_DB) * signal.fftconvolve(x, wash, axes=1)[:, :N]


def scene():
    """Near sounds, their scatter from the trunks, and the far sounds."""
    hits = chops() + snaps() + landing()
    near = hits + rustle() + scrapes() + whistle()
    # near sounds reach the left port a little later
    near[0] = np.interp(T - PORT_LAG_S, T, near[0])
    return near + trunks(hits) + bird() + drone() + hush()


def record(dry):
    """The microphone dips in the lower treble, peaks clip and the top is cut."""
    dry = dry - MIC_DIP_SHARE * band(dry, MIC_DIP_HZ, MIC_DIP_WIDTH_HZ)
    clipped = np.clip(dry, -CLIP_LEVEL, CLIP_LEVEL)
    return signal.sosfilt(signal.ellip(8, 0.2, 50, TOP_HZ, fs=SR, output="sos"), clipped)


dry = scene()
out = record(dry)
output_pcm(out)
```